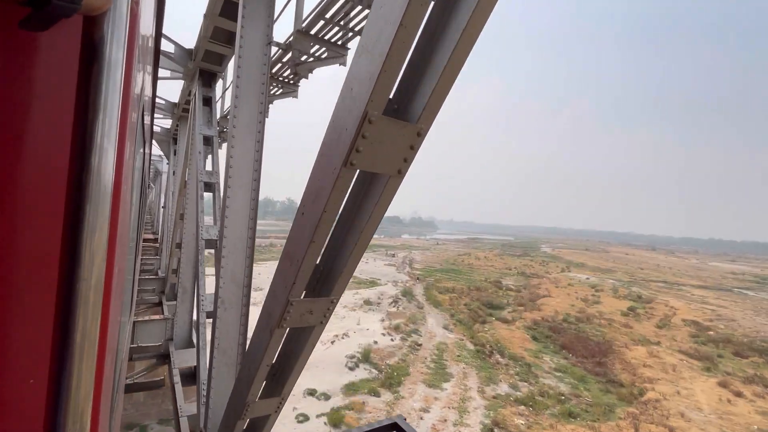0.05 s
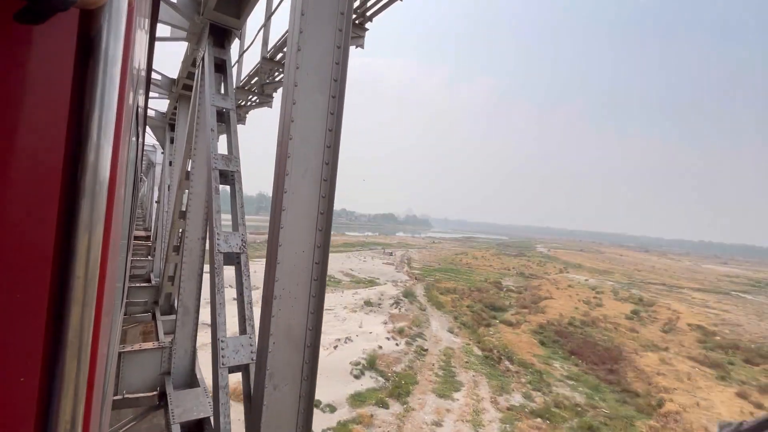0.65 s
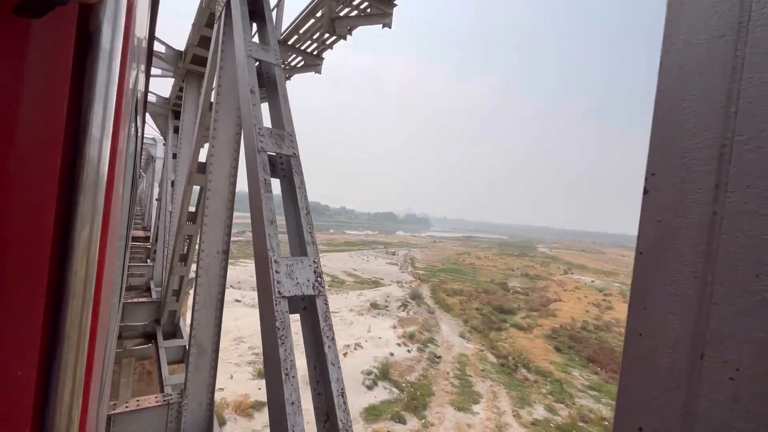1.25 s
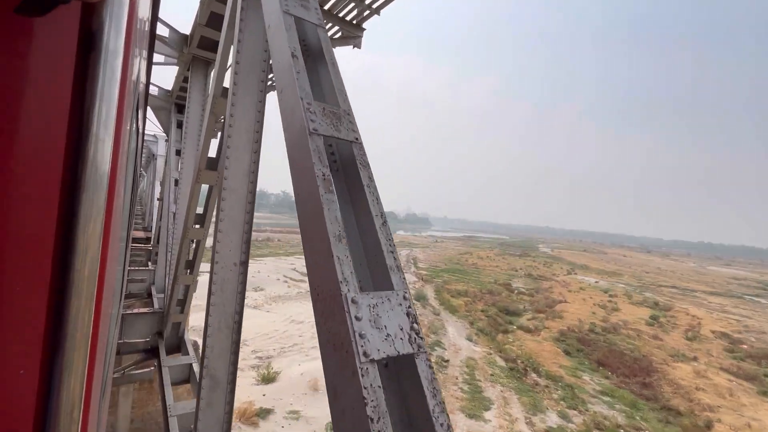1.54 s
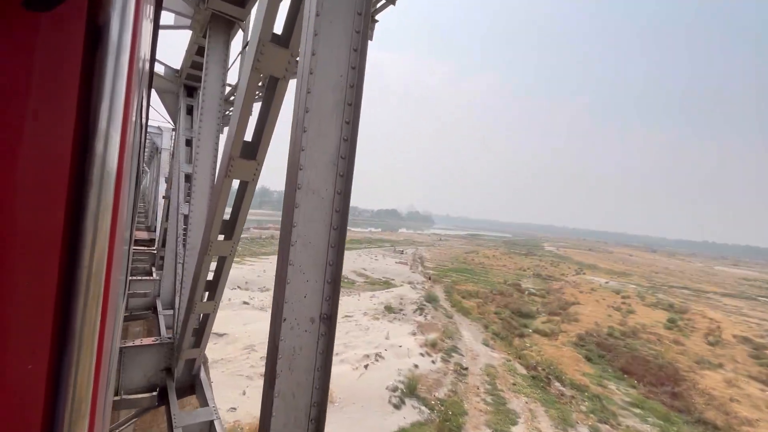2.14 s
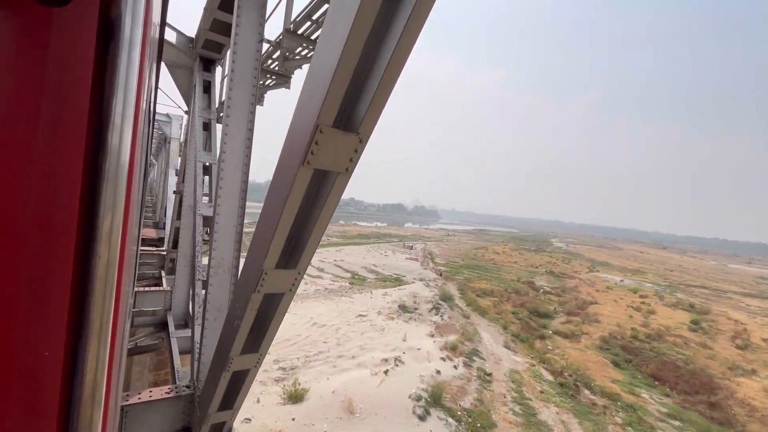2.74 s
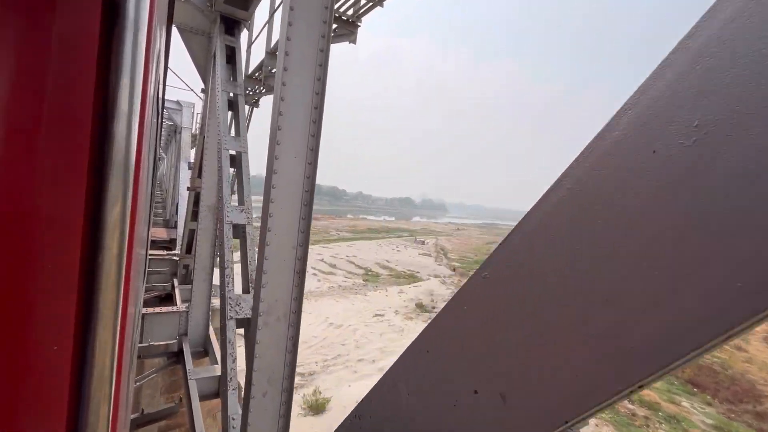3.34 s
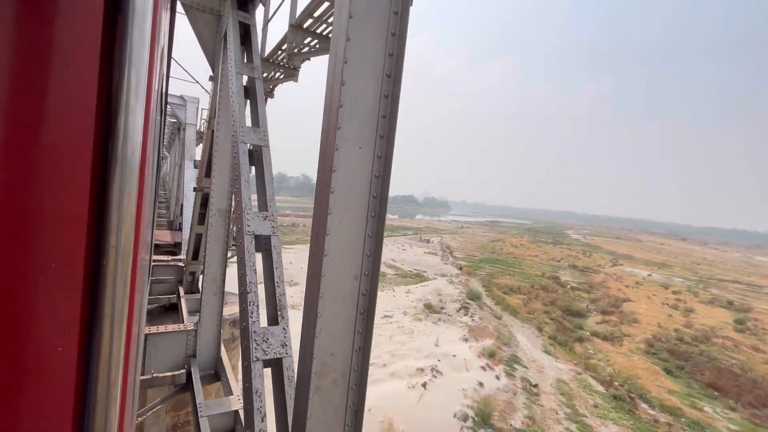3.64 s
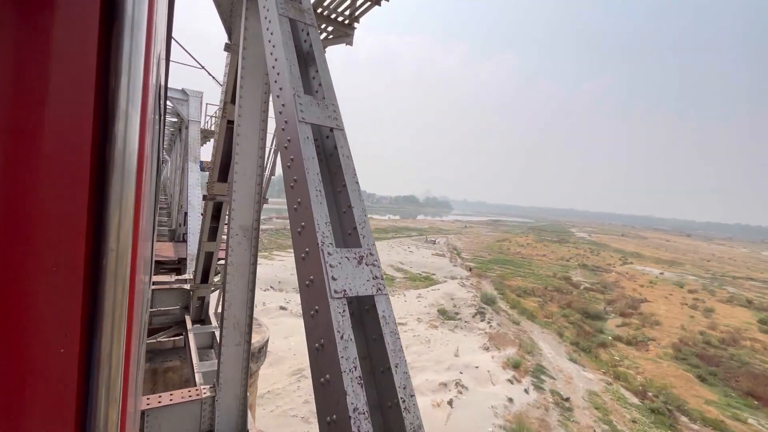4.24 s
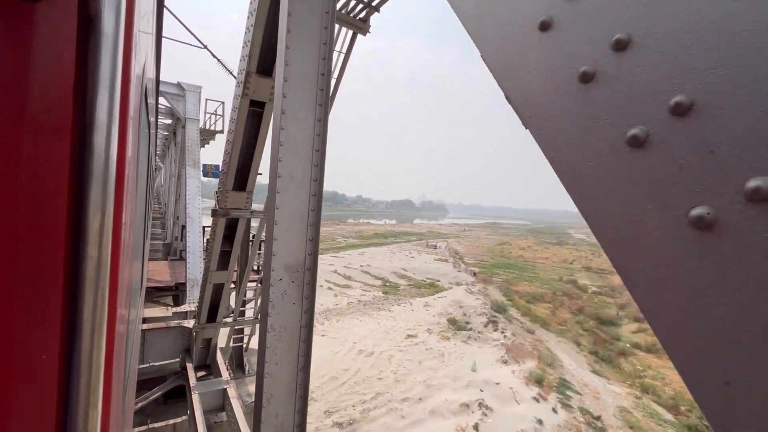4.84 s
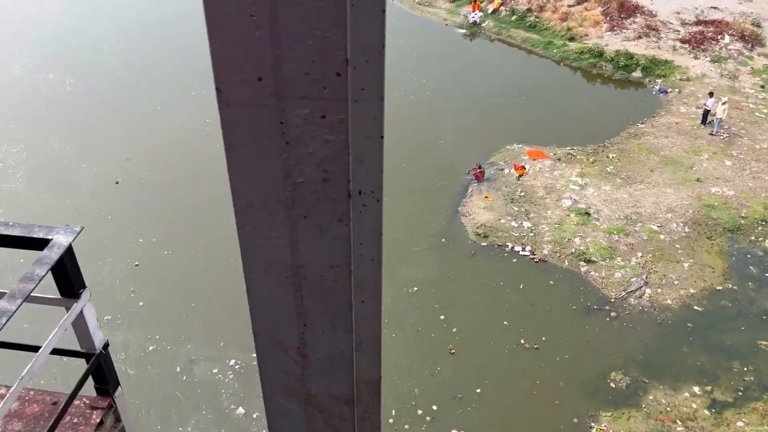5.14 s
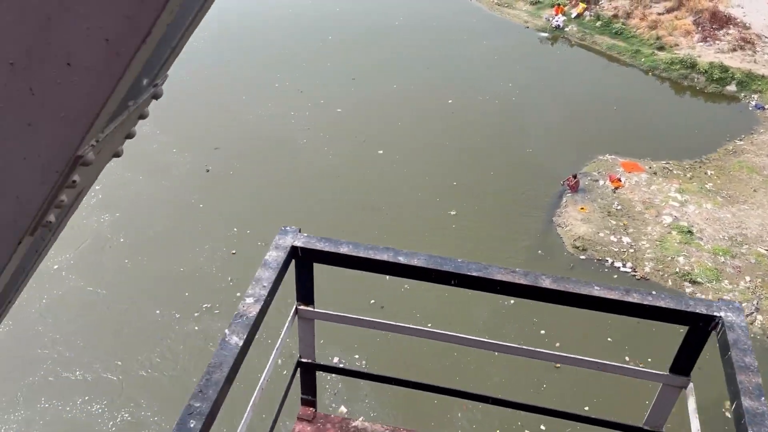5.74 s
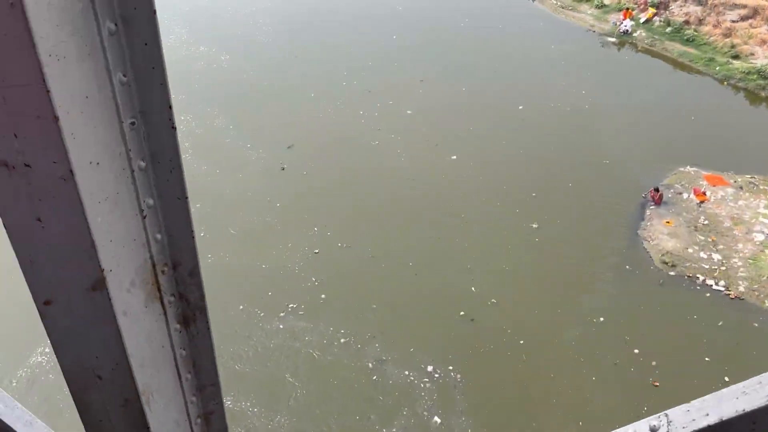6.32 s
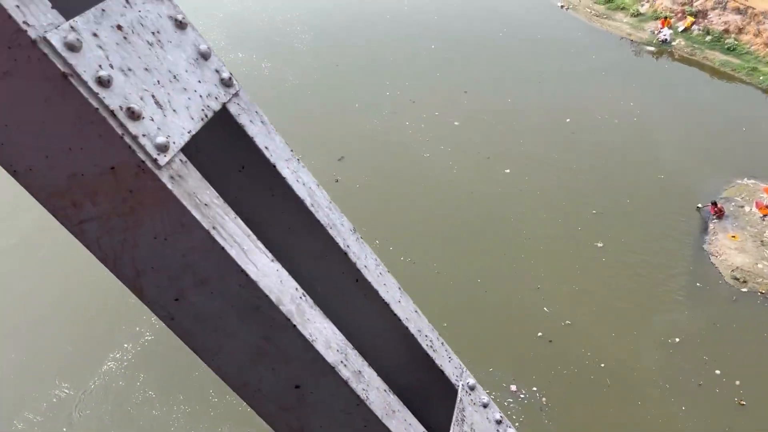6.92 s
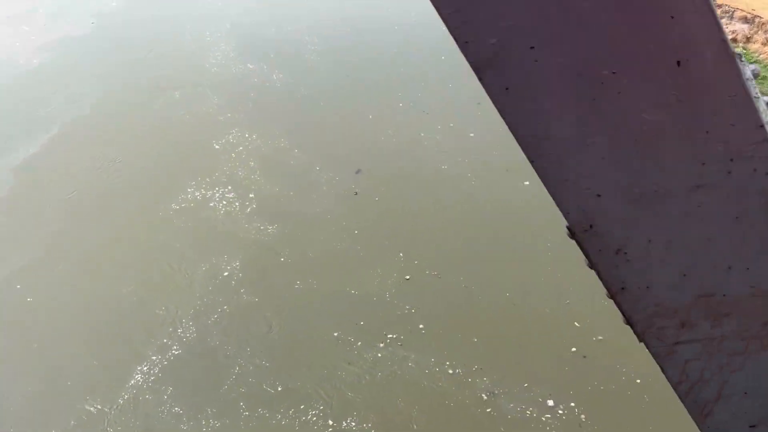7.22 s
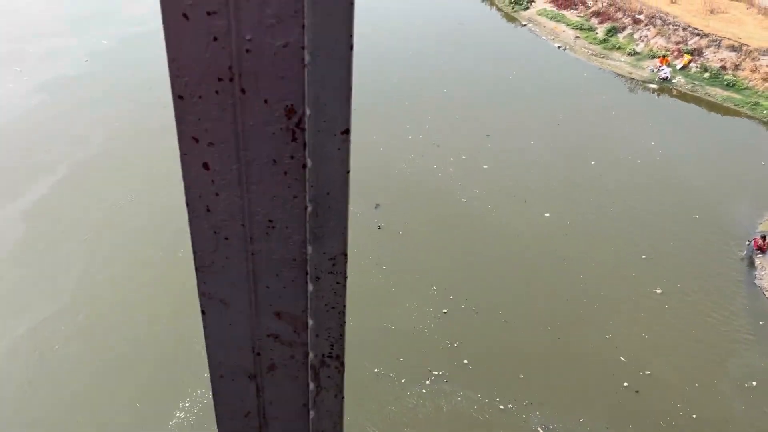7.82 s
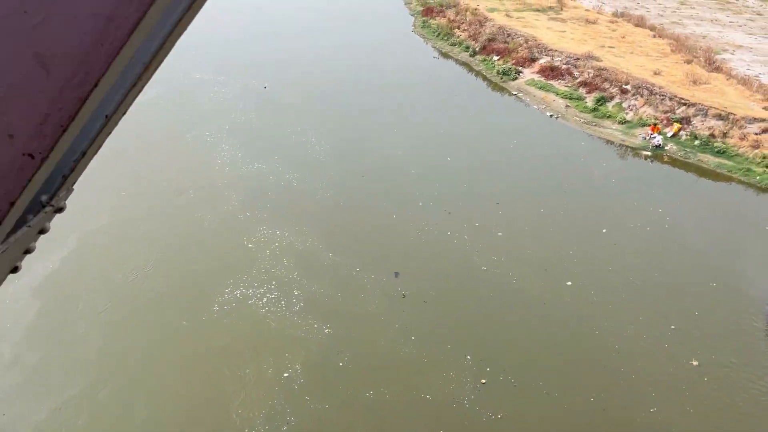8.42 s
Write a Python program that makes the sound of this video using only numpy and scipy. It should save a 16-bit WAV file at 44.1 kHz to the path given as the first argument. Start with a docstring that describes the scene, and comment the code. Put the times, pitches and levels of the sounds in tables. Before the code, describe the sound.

A passenger train rumbles across a steel truss bridge, wheels clacking over rail joints as girders whoosh past the open door.

```python
"""At the open door of a passenger coach, crossing a steel truss bridge.
Rough wheels on rough rail make the deck boom and the girders roar, under hissing treads and a low drone.
Each rail joint brings a clack, a thud and a clank; close steelwork throws back a rush of wheel noise,
and flanges briefly squeal and scrape. Two stretches play, with a short silence between them:
facing along the train, then facing down at the river."""
import sys
import numpy as np
from scipy import signal
from scipy.fft import rfft, irfft, next_fast_len
from scipy.io import wavfile
from scipy.ndimage import uniform_filter1d

SR = 44100
rng = np.random.default_rng(int(sys.argv[2]) if len(sys.argv) > 2 else 0)


def output_pcm(signal):
    """Save a mono or channel-first signal as 16-bit PCM at the path in sys.argv[1].

    Samples are clipped to [-1, 1] before scaling.
    """
    pcm = np.clip(np.atleast_2d(signal).T, -1, 1) * 32767
    wavfile.write(sys.argv[1], SR, np.round(pcm).astype(np.int16))


N = 373527
TIME = np.arange(N) / SR
N_FFT = next_fast_len(N)
HZ = np.fft.rfftfreq(N_FFT, 1 / SR)
STOP_S = 5.0045  # end of the first stretch

# bogies crossing rail joints, mostly in pairs about 0.7 s apart: t/s, thud level/dB, thud t60/s,
# clank level/dB, clank delay/s, rush level/dB, rush delay/s, rush swell/s
JOINTS = [(.597, -5.5, 0.62, -9, 0.013, -10.5, 0.12, 0.06), (1.298, -15, 0.82, -14, .015, -17, 0.07, 0.049),
          (1.785, -4, 0.65, -10, .015, -23, .035, .05), (2.918, 4.5, 0.49, -16, 0.017, -17, 0.076, .04),
          (3.602, 2, 0.5, -2.5, 0.015, -3.5, 0.068, 0.046), (5.798, -4, 3.2, 1, .004, 4, 0.13, 0.056),
          (6.468, -14, 1, -8, 0.016, -1, 0.113, 0.069), (7.878, 1.5, 1.34, -2.5, .018, -3.5, 0.074, 0.062)]
# stereo balance of sound off the steelwork: f/Hz, left over right/dB
STEEL_PAN = [(100, -0.5), (1700, 0.5), (3000, -2.5), (4700, -6), (6500, -3.5), (8500, 1)]
# how far the left microphone trails the right: f/Hz, lag/s
LEFT_LAG = [(50, 0.00014), (280, 0.0003), (700, 0.00045), (2000, 0.0004), (6000, 0.000435),
            (8000, 0.000026)]


def amp(db):
    """Decibels to gain."""
    return 10 ** (np.asarray(db) / 20)


def curve(table, hz=HZ, column=1):
    """One column of a spectrum table, interpolated on a log-frequency axis."""
    columns = np.transpose(table)
    return np.interp(np.log(hz + 1), np.log(columns[0] + 1), columns[column])


def fader(table):
    """A level curve, at every sample."""
    return np.interp(TIME, *np.transpose(table))


def peaks(modes):
    """The boost or cut in dB that a set of resonances gives a spectrum."""
    return sum(db / (1 + (2 * (HZ - hz) / width) ** 2) for hz, width, db in modes)


def wander(rate_hz):
    """Random motion of rms 1, up to the given rate."""
    motion = irfft(rfft(rng.standard_normal(N_FFT)) / (1 + (HZ / rate_hz) ** 4), N_FFT)[:N]
    return motion / motion.std()


def split(x, hz):
    """The bass and the treble of a sound; they sum to it."""
    bass = signal.sosfiltfilt(signal.butter(2, hz, fs=SR, output="sos"), x)
    return bass, x - bass


def stereo_noise(density_db, pan_db=0):
    """Coloured noise at two close microphones: alike in the bass, later on the left."""
    # likeness of the two channels: f/Hz, coherence/0-1
    likeness = [(40, 1), (120, 1), (270, 0.6), (420, 0.5), (750, 0.6), (850, 0.29), (1200, 0), (2500, 0.18),
                (6000, 0.12), (9000, 0.6)]
    common, separate = rfft(rng.standard_normal((2, N_FFT)))
    coherence = curve(likeness)
    left = common * np.exp(-2j * np.pi * HZ * curve(LEFT_LAG))
    right = coherence * common + np.sqrt(1 - coherence ** 2) * separate
    pan = amp(np.array([[.5], [-.5]]) * pan_db)
    pan /= np.sqrt(np.mean(pan ** 2, axis=0))
    return irfft(np.array([left, right]) * pan * amp(density_db), N_FFT)[:, :N] * np.sqrt(SR / 2)


def rolling(colour, modes, level_db, boom_db, flutter_db, judder_db=.5):
    """Rough wheels on rough rail: the deck booms, the girders roar and the treads hiss, all unsteadily."""
    # slow level rides for deck boom, girder roar and tread hiss: t/s, level/dB
    boom_ride = [(0, -26), (1.4, -24), (2.4, -28), (3.3, -24.5), (4.55, -23.5), (4.95, -26), (5.4, -20.5),
                 (6.45, -25), (6.85, -21.5), (7.7, -27.5), (8.1, -24.5), (8.47, -24.5)]
    roar_ride = [(0, -0.5), (1, 1), (2.1, 0.3), (3.8, 0.6), (4.5, -0.9), (5.2, 1.1), (7.7, 1), (8.47, 1.5)]
    hiss_ride = [(0, 1.5), (.85, 2.5), (1.15, 2.8), (2.6, 1.3), (3.25, 0.9), (4.1, 2.6), (4.6, 1.1),
                 (5.2, 0), (6.4, -1.3), (7.2, -3), (7.65, -3), (8, -2), (8.47, -1.5)]
    noise = stereo_noise(curve(colour) + peaks(modes) + level_db, curve(colour, column=2))
    rumble, hiss = split(noise, hz=1070)
    boom, roar = split(rumble, hz=137.4)
    judder = wander(35)
    boom = boom / boom.std() * amp(fader(boom_ride) + boom_db)
    roar = roar * amp(fader(roar_ride) + judder_db * judder)
    hiss = hiss * amp(fader(hiss_ride) + flutter_db * (judder + wander(5.7)))
    return boom + roar + hiss


def drone(pitch_hz=236.3, waver_hz=.5, level_db=-.7, throb_db=.8):
    """A wavering low note from the running gear, a little to the left."""
    # swells of the note: t/s, level/dB
    ride = [(0, -36), (.2, -27.5), (.49, -30), (.62, -28), (1, -28.5), (1.3, -32), (1.72, -27), (1.93, -31),
            (2.17, -25.5), (2.6, -27.5), (3, -32), (3.37, -26), (3.8, -34), (5.3, -35), (5.8, -26),
            (6.1, -34), (8.47, -37)]
    cycles = np.cumsum(pitch_hz + waver_hz * wander(12.2)) / SR
    note = np.sqrt(2) * np.sin(2 * np.pi * cycles)
    return note * amp(fader(ride) + level_db + throb_db * wander(13)) * amp([[1.5], [-1.5]])


def lattice_echoes(x, patchy_db=2, from_hz=300):
    """Echoes from the moving lattice add and cancel, so narrow bands swell and fade at random."""
    hz, _, bands = signal.stft(x, SR, nperseg=1024, noverlap=768)
    patches = uniform_filter1d(rng.standard_normal(bands.shape[1:]), size=3, axis=0)  # across pitch
    patches = uniform_filter1d(patches, size=18, axis=1)  # across time
    depth_db = patchy_db * (hz / (hz + from_hz))[:, None]
    gain = amp(depth_db * patches / patches.std())
    gain /= np.sqrt(np.mean(gain ** 2, axis=1, keepdims=True))
    return signal.istft(bands * gain, SR, nperseg=1024, noverlap=768)[1][:, :N]


def singing_mode(hz, width_hz):
    """A randomly driven resonance with steep skirts that follows the pitch curve hz, rms 1."""
    real, imag = rng.standard_normal((2, 2, len(hz)))
    drift = signal.sosfilt(signal.butter(2, width_hz / 2, fs=SR, output="sos"), real + 1j * imag)
    drift = drift + drift[::-1] / 2  # the microphones share part of the sound
    tone = (drift * np.exp(2j * np.pi * np.cumsum(hz) / SR)).real
    return tone / tone.std()


def flange_squeals(rough_db=2):
    """Brief, juddering flange contact makes the wheel's modes sing: one in a light touch, many in a rub."""
    # ringing modes of a wheel: f/Hz, width/Hz, level/dB
    wheel_modes = [(940, 70, -41), (1130, 60, -43), (1355, 40, -38.5), (1420, 70, -34.5), (1561, 45, -34),
                   (1690, 90, -41), (1830, 70, -37.5), (2116, 60, -40.5), (3620, 100, -44.5),
                   (3760, 140, -50), (4370, 130, -54), (5744, 140, -46), (5850, 330, -42.5),
                   (6250, 350, -47.5), (7400, 350, -54.5), (8250, 340, -51.5), (10030, 400, -51.5),
                   (10600, 300, -55)]
    # flange on rail: t/s, half length/s, level/dB, f driven hardest/Hz, spread/oct, glide/(oct per s)
    rubs = [(.402, .014, -1, 3600, .1, -6), (4.125, .03, -4, 7700, .15, 0), (5.63, .05, -8, 8350, .06, 0),
            (5.64, .06, 2, 4370, .08, 0), (5.945, .042, -1, 1700, 1.2, .1),
            (6.02, .034, -1.5, 1300, .22, -1), (5.995, .055, 0, 6000, .9, -.1)]
    out = np.zeros((2, N))
    for s, half_length, db, driven_hz, spread, glide in rubs:
        live = abs(TIME - s) < 2 * half_length
        age = TIME[live] - s
        contact = np.exp(-.5 * (age / half_length) ** 4)
        for hz, width, mode_db in wheel_modes:
            drive = np.exp(-.5 * (np.log2(hz / driven_hz) / spread) ** 2)
            tone = singing_mode(hz * 2 ** (glide * age), width)
            out[:, live] += tone * contact * drive * amp(db + mode_db)
    grip = amp(rough_db * wander(90))
    return out * grip / np.sqrt(np.mean(grip ** 2))


def rail_clacks(rattle_db=.46, hinge_hz=1200, bite_db=7, bite_hz=1900, bite_width_hz=700, bite_s=.013):
    """Each blow sets the crowded modes of rail and girders ringing; loose gear rattles in the tail."""
    # tone of the struck steel: f/Hz, level/dB
    colour = [(25, -81), (60, -60), (150, -55.5), (330, -48.5), (420, -50.5), (550, -46), (750, -53.5),
              (1050, -61), (1700, -67), (3000, -71.5), (4700, -73.5), (7000, -81.5), (11000, -91)]
    # its resonances: f/Hz, width/Hz, boost/dB
    modes = [(306.4, 11, 6), (537, 140, 0), (752, 38, 2), (1680, 60, -0.5)]
    # its envelope, band by band: f/Hz, base t60/s, attack/s
    ring = [(100, 0.91, 0.0073), (500, 0.44, 0.0049), (1500, 0.66, 0.0016), (4900, 0.9, 0.015),
            (11000, 0.38, 0.0083)]
    # wheels striking rail ends and knocking again: t/s, level/dB, treble tilt/dB, factor on t60
    blows = [(.597, 1.5, -0.5, 0.94), (.612, -1, -5, 0.6), (.636, -6.5, 10.5, .8), (.667, 5, -11, 0.65),
             (.737, -5, -10, .6), (.762, -3.5, -0.5, 0.91), (1.312, -3.5, 6, .6), (1.343, -6.5, 8, .6),
             (1.372, -3.5, 4.5, 0.6), (1.408, -1, -1, .5), (1.451, -4, -5, .4), (1.785, 1, -8, .65),
             (1.810, -1, -8, 0.55), (2.919, 3, 3, 0.4), (2.944, -1.5, 4, 0.55), (2.985, -2.5, 2, 0.56),
             (3.020, 0.5, -6, 0.65), (3.604, 2.5, 3, 0.69), (3.617, 4, -14, 0.8), (3.680, -3, 6.5, .7),
             (3.770, -5.5, -1, 0.99), (4.695, -6, 4, .7), (4.759, -7, -1, 0.54), (4.790, -11, 4.5, 2.2),
             (5.800, 3, -16, .55), (5.813, 2, -13, .55), (5.835, 2.5, -9, .55), (5.847, 1, -11, 0.7),
             (5.883, -1, -12, 0.46), (6.468, -0.5, -5.5, 2.3), (6.490, -12, 2, 1.6), (6.535, -4, -9, 1.7),
             (7.881, 6.5, -13, 1), (7.903, 4, -9, 0.5), (7.935, 3, -7, 0.74), (7.967, 2, -16, .8),
             (8.030, 2, -16, 0.72), (8.088, -8, 0, 1.6), (8.322, -8, -16, 0.65)]
    steel = stereo_noise(curve(colour) + peaks(modes), curve(STEEL_PAN))
    hz, t, bands = signal.stft(steel, SR, nperseg=256)
    hz = hz[:, None]
    treble = hz ** 2 / (hz ** 2 + hinge_hz ** 2)
    rim = amp(bite_db) * np.exp(-.5 * ((hz - bite_hz) / bite_width_hz) ** 2)
    power = np.zeros(bands.shape[1:])
    for s, db, tilt_db, ring_factor in blows:
        live = (t > s) & (t < s + 1)
        age = t[live] - s
        attack = 1 - np.exp(-age / curve(ring, hz, column=2))
        bite = rim * np.exp(-age / bite_s)  # the wheel rim bites first
        tail = amp(-60 * age / (ring_factor * curve(ring, hz)))
        power[:, live] += (amp(db + tilt_db * treble) * attack * np.hypot(tail, bite)) ** 2
    clatter = signal.istft(bands * np.sqrt(power), SR, nperseg=256)[1][:, :N]
    return clatter * amp(rattle_db * wander(70))


def deck_thuds(attack_s=.043):
    """Each bogie drops onto the deck, whose low modes build up quickly and rumble on."""
    # deep tone of the deck: f/Hz, level/dB
    colour = [(25, -75), (55, -43), (72, -36), (110, -41.5), (150, -38.5), (240, -51), (290, -39),
              (380, -61.5), (700, -79), (2000, -110)]
    # its low resonances: f/Hz, width/Hz, boost/dB
    modes = [(71, 14, 0), (104, 15, 4.5), (280, 33, 1)]
    power = np.zeros(N)
    for s, db, t60, *_ in JOINTS:
        age = np.maximum(TIME - s, 0)
        attack = 1 - np.exp(-age / attack_s)
        power += (attack * amp(db - 60 * age / t60)) ** 2
    return stereo_noise(curve(colour) + peaks(modes)) * np.sqrt(power)


def girder_clanks(attack_s=.003):
    """A wheel drops off the rail end and rings the girder beneath; each side hears its own mix of modes."""
    # modes of a cross girder: f/Hz, level/dB, t60/s
    modes = [(243, -24, .25), (512, -19, .3), (548, -21, .26), (640, -21, .2), (762, -22.5, .18),
             (800, -26, .22), (885, -26, .24), (1085, -28, .14)]
    out = np.zeros((2, N))
    for s, _, _, db, delay, *_ in JOINTS:
        live = (TIME > s + delay) & (TIME < s + delay + .5)
        age = TIME[live] - s - delay
        attack = 1 - np.exp(-age / attack_s)
        for hz, mode_db, t60 in modes:
            phase = rng.uniform(0, 2 * np.pi) + rng.normal(0, .91, (2, 1))
            lag = np.array([[curve(LEFT_LAG, hz)], [0]])
            ring = np.sin(2 * np.pi * hz * rng.uniform(.98, 1.02) * (age - lag) + phase)
            out[:, live] += ring * attack * amp(db + mode_db - 60 * age / t60)
    return out


def steel_rushes(bass_db=-5.5, treble_db=.4, fizz_ahead_db=-4, fade_stretch=1.47):
    """Steelwork mirrors wheel noise into the door, in a whoosh after each joint and at close girders."""
    # tone of the reflected noise: f/Hz, level/dB
    colour = [(30, -88), (250, -57), (550, -47.5), (1100, -64), (1600, -63), (2450, -68), (3000, -72.5),
              (4700, -76.5), (6800, -83.5), (9000, -81.5), (11000, -86.5)]
    # girders sweeping past: t when nearest/s, level/dB, swell/s
    passes = [(2.84, -8.5, 0.03), (3.475, -2.5, 0.041), (4.11, -6.5, .038), (5.28, -11, 0.022),
              (6.17, -5, 0.054), (7.15, -9.5, 0.095)]
    bass, treble = split(stereo_noise(curve(colour), curve(STEEL_PAN)), hz=1800)
    treble, fizz = split(treble, hz=7000)
    treble = treble + fizz * amp(fizz_ahead_db * (TIME < STOP_S))  # duller when facing along the train
    echoes = [(s + delay, db, swell) for s, *_, db, delay, swell in JOINTS]
    s, db, swell = np.transpose(echoes + list(passes))[:, :, None]
    t = TIME[::64]
    width = np.where(t < s, swell, swell * fade_stretch)
    nearness = np.exp(-.5 * ((t - s) / width) ** 2)
    power = np.interp(TIME, t, np.sum(nearness * amp(db) ** 2, axis=0))
    return (bass * amp(bass_db) + treble * amp(treble_db)) * np.sqrt(power)


def flange_scrapes(centre_hz=1580, half_width_oct=.33, grit_db=1.5):
    """A flange grinds dryly along the rail head, too rough to sing: a gritty band swells and fades."""
    # dry contacts: t when hardest/s, swell/s, level/dB
    scrapes = [(7.85, .055, -67.5), (7.922, .016, -61.5), (7.985, .025, -64.5)]
    band_db = -10 * np.log10(1 + (np.log2((HZ + 1) / centre_hz) / half_width_oct) ** 4)
    power = sum(amp(db) ** 2 * np.exp(-.5 * ((TIME - s) / swell) ** 2) for s, swell, db in scrapes)
    return stereo_noise(band_db) * np.sqrt(power) * amp(grit_db * wander(120))


def scene():
    """A bed of rolling noise for each stretch, with the joints, steelwork and wheel notes on top."""
    # rolling tone facing along the train, and facing down: f/Hz, level/dB, left over right/dB
    ahead_colour = [(25, -86, -0.1), (43.4, -54.5, -6), (74, -43, 7.5), (109.6, -41.5, -4.5),
                    (138, -45.5, 6), (282, -50, 0), (438, -55.5, -1), (546, -54, 0), (803, -60.5, -4),
                    (1550, -66.5, -0.5), (2750, -77, -1.5), (5080, -80, -8.5), (6320, -87.5, -6),
                    (8060, -90, -0.5), (10850, -101, 0)]
    down_colour = [(25, -84, 2.2), (45.5, -46.5, 1), (73.6, -38.5, 2.5), (102, -36.5, 1), (131, -44, 0),
                   (278, -48.5, -1), (458, -55.5, 0), (610, -55.5, 0.5), (915, -63, -0.5),
                   (1700, -67.5, 1.5), (3000, -78, -2), (5020, -82.5, -6), (6760, -93, -2.3),
                   (7840, -89, 1), (11000, -94.5, -1)]
    # resonances of deck and coach: f/Hz, width/Hz, boost/dB
    body = [(112, 9.9, 2.5), (200.7, 33, 4), (351, 22.5, 4), (504, 78, 2), (1790, 450, -1)]
    # hollow colour of the doorway when facing down: f/Hz, width/Hz, boost/dB
    doorway = [(1140, 760, -4), (1710, 790, 3.5)]
    ahead = rolling(ahead_colour, body, level_db=-1, boom_db=.5, flutter_db=.5)
    down = rolling(down_colour, body + doorway, level_db=-.32, boom_db=1, flutter_db=.45)
    bed = lattice_echoes(np.where(TIME < STOP_S, ahead, down) + steel_rushes())
    impacts = rail_clacks() + girder_clanks() + deck_thuds()
    return bed + impacts + drone() + flange_squeals() + flange_scrapes()


def record(dry, resume_s=5.053, fade_s=.042, low_cut_hz=20, high_cut_hz=11500):
    """The band-limited sound drops out between the stretches and fades back in."""
    gate = np.where(TIME < STOP_S, 1, np.clip((TIME - resume_s) / fade_s, 0, 1))
    gated = signal.sosfilt(signal.butter(2, low_cut_hz, "high", fs=SR, output="sos"), dry) * gate
    lowpass = signal.firwin(301, high_cut_hz, window=("kaiser", 9), fs=SR)
    return signal.oaconvolve(gated, lowpass[None], "same")


dry = scene()
out = record(dry)
output_pcm(out)
```